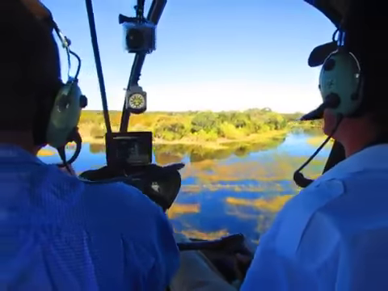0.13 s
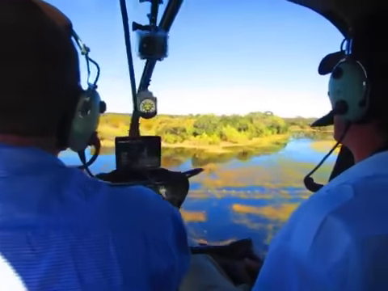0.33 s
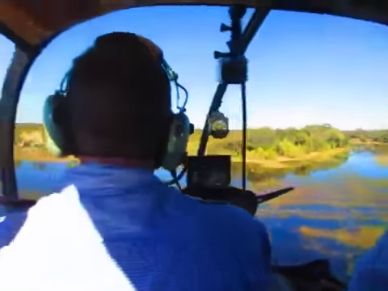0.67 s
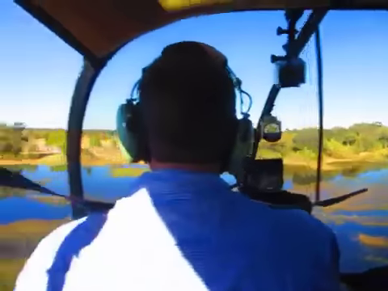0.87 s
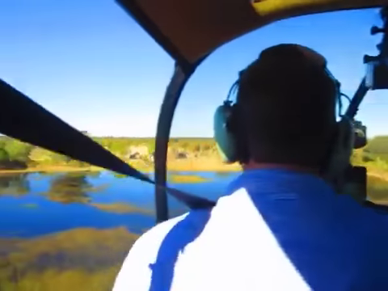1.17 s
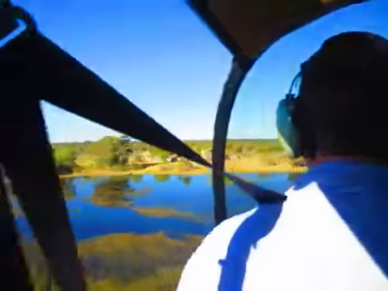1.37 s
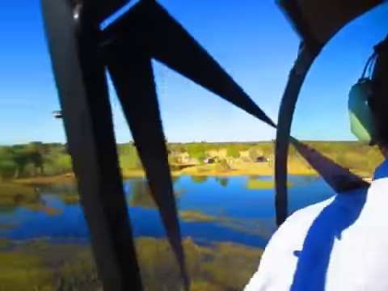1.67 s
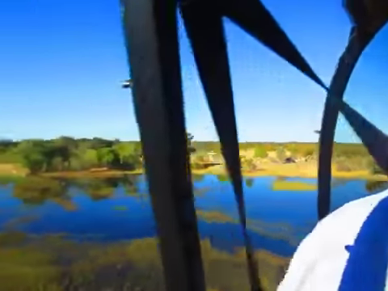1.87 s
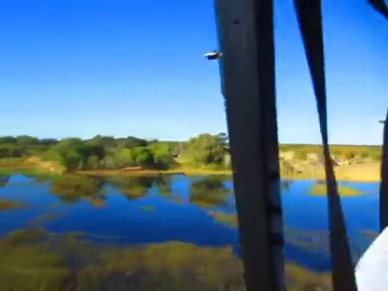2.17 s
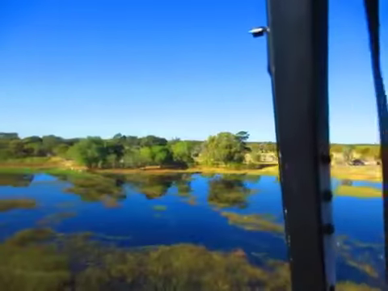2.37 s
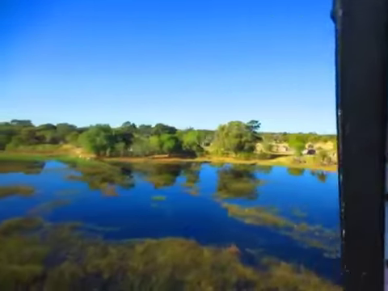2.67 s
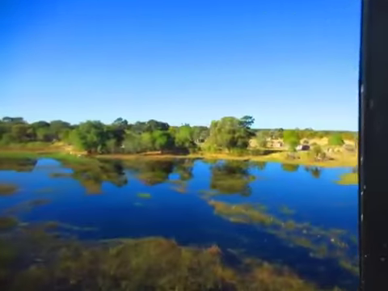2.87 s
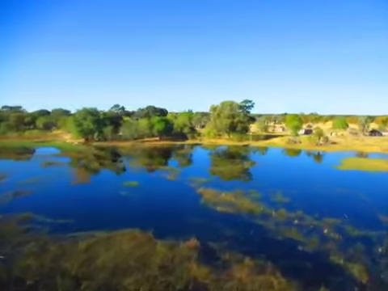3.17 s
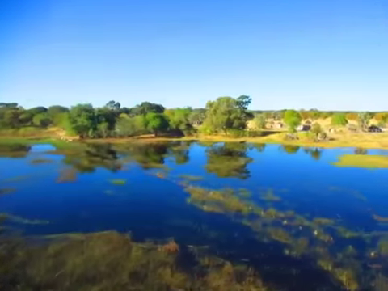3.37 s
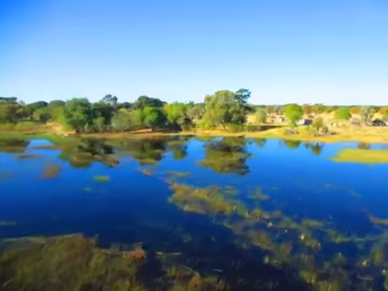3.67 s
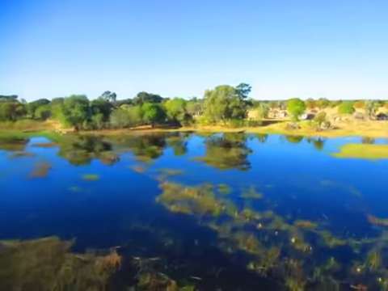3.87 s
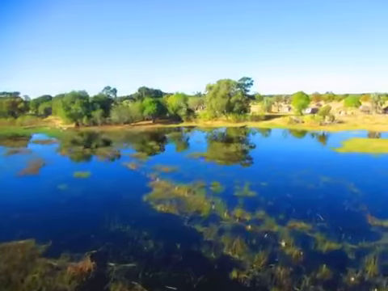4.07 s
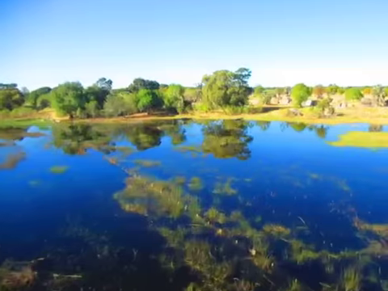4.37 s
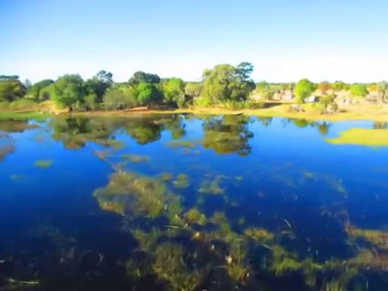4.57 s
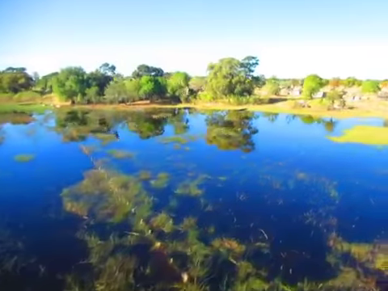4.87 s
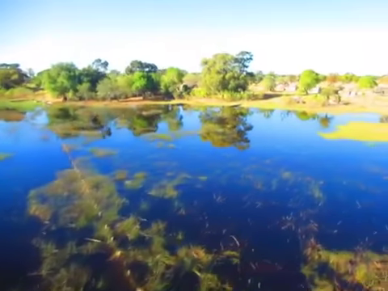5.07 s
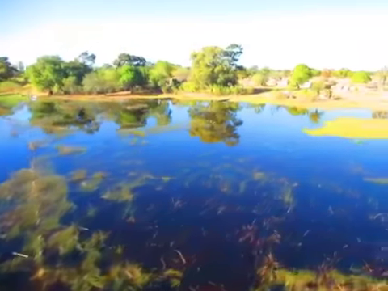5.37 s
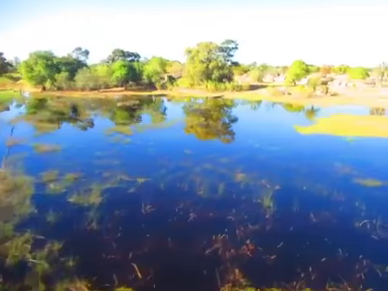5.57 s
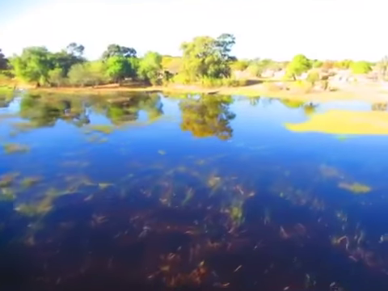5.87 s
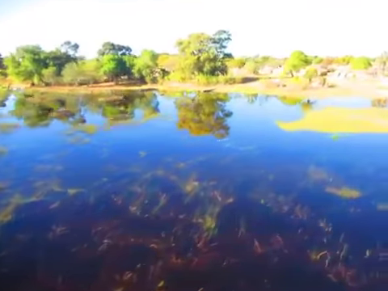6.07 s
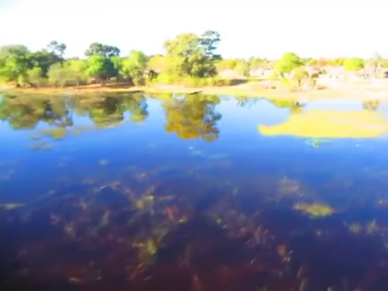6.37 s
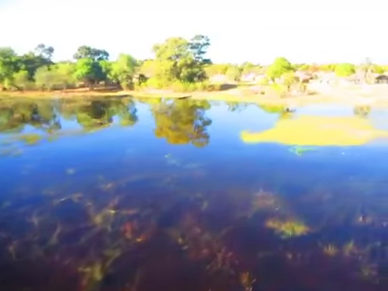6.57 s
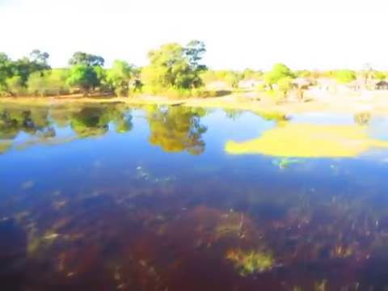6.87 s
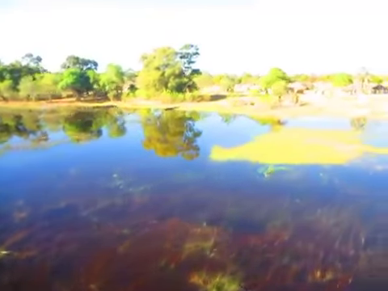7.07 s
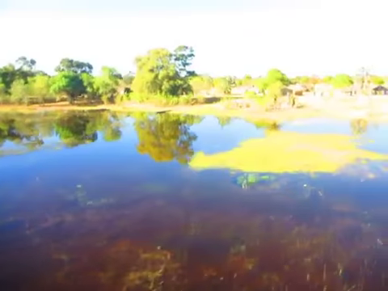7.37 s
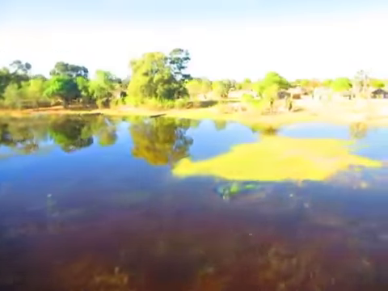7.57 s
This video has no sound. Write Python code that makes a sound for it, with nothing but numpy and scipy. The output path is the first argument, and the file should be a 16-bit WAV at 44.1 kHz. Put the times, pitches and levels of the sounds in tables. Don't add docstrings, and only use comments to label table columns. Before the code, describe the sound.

Inside a small helicopter, rapid hard blade slaps and a humming engine give way to windy, buffeting, crackling downwash at the open door.

```python
import sys
import numpy as np
from scipy import signal
from scipy.io import wavfile
from scipy.ndimage import uniform_filter1d

SR = 44100
rng = np.random.default_rng(int(sys.argv[2]) if len(sys.argv) > 2 else 0)


def invert_db(level):
    return 10 ** (np.asarray(level, dtype=float) / 20)


def unload_wav(signal):
    wavfile.write(
        sys.argv[1],
        SR,
        np.round(np.clip(np.atleast_2d(signal).T, -1, 1) * 32767).astype(np.int16),
    )


N = 340452
TIME = np.arange(N) / SR
BLADE_HZ = 13.68
FIRING_HZ = 136.6
TURN_S = (1.28, 4)


def turned(pair):
    return np.interp(TIME, TURN_S, pair)


def curves(table):
    s, *columns = np.transpose(table)
    return [np.interp(TIME, s, c) for c in columns]


def band(x, lo_hz, hi_hz):
    sos = signal.butter(3, [lo_hz, min(hi_hz, .45 * SR)], "band", fs=SR, output="sos")
    return signal.sosfilt(sos, x)


def hiss(lo_hz, hi_hz):
    x = band(rng.standard_normal(N), lo_hz, hi_hz)
    return x / x.std()


def walk(rate):
    k = int(SR / rate)
    held = np.repeat(rng.standard_normal(N // k + 1), k)
    return 1.09 * uniform_filter1d(uniform_filter1d(held, k), k)[:N]


def fade(x, s):
    return signal.lfilter([1], [1, -np.exp(-1 / (max(s, 1e-4) * SR))], x)


def strikes(lag_ms, db, jitter_ms, scatter_db):
    beat = np.arange(int(N / SR * BLADE_HZ) + 1) / BLADE_HZ
    wildness = np.interp(beat, [2, 4.5], [1, 1.6])
    late, louder = rng.standard_normal((len(beat), 2)).T * wildness
    near = ((beat + .02) * SR).astype(int)
    at = ((beat + (lag_ms[near] + jitter_ms * late) / 1000) * SR).astype(int)
    out = np.zeros(N)
    out[np.clip(at, 0, N - 1)] = invert_db(db[near] + scatter_db * louder)
    return out


def hat(x, front_ms, back_ms, before, after):
    ms = np.arange(-600, 601) / SR * 1000
    u = ms / np.where(ms < 0, front_ms, back_ms)
    shoulders = before * np.exp(-((ms + 2.9) / 1.5) ** 2)
    shoulders += after * np.exp(-((ms - 3.0) / 0.9) ** 2)
    return signal.fftconvolve(x, np.exp(-u ** 2) - shoulders, "same")


def ring(x, modes):
    t = TIME[:SR // 2]
    tail = sum(invert_db(db) * np.sin(2 * np.pi * hz * t) * 1000. ** (-t / t60) for hz, t60, db in modes)
    soft_start = 1 - np.exp(-(t / 0.00056) ** 2)
    return signal.fftconvolve(x, tail * soft_start)[:N]


# time in seconds, boom in Hz,
# boom level in dB, door frame in Hz, frame level in dB.
HOLLOW_TUNING = [(0, 96, -10.5, 168, -9), (.6, 94, -22, 184, -18), (.95, 91, -12.5, 197, -7),
                 (1.5, 89, -6.5, 200, -21), (1.75, 101, -12, 250, -5.5), (2.1, 105, -34, 243, -3.5),
                 (2.4, 106, -12, 257, -21), (2.7, 126, -14, 235, -17), (3, 99, -17, 212, -8),
                 (3.4, 90, -28, 256, -9), (3.8, 94, -20, 254, -27), (4.3, 85, -7, 180, -23),
                 (4.8, 92, -18, 203, -4), (5.4, 88, -10.5, 258, -8.5), (6, 85.5, -13, 251, -15),
                 (7.72, 91, -6, 243, -16)]
BOOM_T60_S, FRAME_T60_S = .17, .065


def hollows(blows):
    out, t = np.zeros(N + SR), TIME[:SR // 5]
    boom_hz, boom_db, frame_hz, frame_db = curves(HOLLOW_TUNING)
    for i in np.flatnonzero(blows):
        boom = invert_db(boom_db[i]) * np.sin(2 * np.pi * boom_hz[i] * t) * 1000. ** (-t / BOOM_T60_S)
        frame = invert_db(frame_db[i]) * np.sin(2 * np.pi * frame_hz[i] * t) * 1000. ** (-t / FRAME_T60_S)
        out[i:i + len(t)] += blows[i] * (boom + frame)
    return out[:N]


# time in seconds, slap peak in dB.
SLAP_LEVEL = [(0, -5), (.35, -5.5), (.9, -4.5), (1.2, -7), (1.5, -9), (2.07, -11), (2.4, -14.5),
              (2.94, -14), (3.5, -11.5), (4.1, -10.5), (4.45, -22.5), (5, -15), (5.6, -13.5), (6, -29),
              (6.45, -9.5), (6.75, -55), (7.1, -32), (7.72, -19)]
# time in seconds,
# slap lag in ms, swish lag in ms.
BLADE_LAG = [(0, 10.2, 18), (.7, 10.3, 15), (1.3, 12, 8), (1.9, 13.9, 1), (2.7, 15.9, 0), (3.75, 15.5, -4),
             (4.4, 15.6, -1), (5.3, 19.9, 0), (5.9, 21, 2), (6.7, 24.4, 4.5), (7.4, 24.9, 6),
             (7.72, 25.3, 13)]
# time in seconds, delay after the
# first strike in ms, level against the first in dB.
WAKE_STRIKE = [
    (0, 25.7, -9.5),
    (1, 28.5, -10.5),
    (1.6, 24.6, -8),
    (2.3, 26.6, -2.5),
    (2.75, 18.7, 0),
    (3.4, 18.7, -5.5),
    (4, 14.5, -4),
    (4.4, 14.8, 2),
    (4.9, 8.9, -10.5),
    (7.72, 9.7, -19),
]
# mode in Hz, decay T60 in seconds, level in dB.
CABIN_MODES = [
    (126, 0.22, -2),
    (275, 0.04, 1.5),
    (327, 0.021, -1.5),
    (699, 0.086, -6.5),
    (1197, 0.035, -9.5),
    (1600, 0.022, -47),
    (2010, 0.055, -37),
    (2780, 0.019, -63),
]
PANEL_DB, CRACK_DB, SPIKE_DB = (-7, -29), (-24, -33), (-1, -4.5)
BLUNT = (0, .7)
SUCK_IN = .72
WAKE_DIP_MS, WAKE_DIP = 5.6, 0.29
ECHO_SHARE = .6


def slaps():
    lag_ms = curves(BLADE_LAG)[0]
    wake_ms, wake_db = curves(WAKE_STRIKE)
    db = curves(SLAP_LEVEL)[0]
    first = strikes(lag_ms, db, jitter_ms=.08, scatter_db=1.0)
    second = strikes(lag_ms + wake_ms, db + wake_db, jitter_ms=.15, scatter_db=1.5)
    cabin = ring((0.16 * second - first) * invert_db(turned(PANEL_DB) - 6.5), CABIN_MODES)
    door = hollows(0.62 * second - first)

    tear = strikes(lag_ms + 2, turned(CRACK_DB) - 27, jitter_ms=.4, scatter_db=1.0)
    tear += .4 * np.roll(tear, int(.003 * SR))
    tear_front = 1.1 * np.roll(tear / 1, -int(.0022 * SR))
    tear = tear + tear_front
    grit = hiss(634, 803) + invert_db(-2.5) * hiss(690, 1360) + invert_db(-12.0) * hiss(1760, 2520)
    grit += invert_db(-27) * hiss(2230, 3530) + invert_db(-35) * hiss(4250, 4700)
    torn = fade(fade(tear, .0022), .0003)
    click = np.r_[1., np.zeros(SR // 10)]
    burst = fade(fade(click, .0022), .0003) * grit[SR:SR + len(click)]
    crack = np.sqrt(1 - ECHO_SHARE) * torn * grit
    crack += np.sqrt(ECHO_SHARE) * signal.fftconvolve(tear, burst)[:N]

    dip = WAKE_DIP * hat(np.roll(second, -int(WAKE_DIP_MS / 1000 * SR)), 1.0, 0.6, 0, 0)
    spike = first * invert_db(turned(SPIKE_DB))
    sharp = hat(spike * (1 - turned(BLUNT)), 0.31, 0.44, SUCK_IN, 0.67)
    blunt = hat(spike * turned(BLUNT), .9, 1.1, .9, .55)
    wake = hat(second, 0.47, 4.3, 0.046, 0.78)
    return wake - dip - sharp - blunt + cabin + door + crack


# time in seconds, firing tone in dB, its octave in dB.
ENGINE_LEVEL = [(0, -22, -36), (.5, -23.5, -31), (1.2, -25.5, -36.5), (1.9, -39, -37), (2.3, -54, -32),
                (2.55, -30.5, -54), (2.9, -33.5, -40), (3.3, -35.5, -40.5), (4.4, -33.5, -63),
                (5.0, -43, -45), (5.45, -43, -29.5), (5.65, -34, -43), (6.1, -34, -36.5), (6.6, -34.5, -43),
                (7, -39, -35.5), (7.4, -34, -36), (7.72, -32.5, -65)]
# multiple of the firing rate, level at the cabin seat in dB.
SHAFT_LINES = [
    (.834, -35),
    (2.335, -38),
    (2.668, -37),
    (2.851, -38),
    (3.627, -39),
]
# multiple of the firing rate, level in dB.
HUM_LINES = [
    (1.666, -44),
    (3.0, -47),
]
SHAFT_FADE_S, SHAFT_FADE_DB = (1.47, 4.24), (-0.5, -18)
HALF_DB = (-31, -56)
FAN_DB = (-74, -93)


def engine():
    tone_db, octave_db = curves(ENGINE_LEVEL)
    phase = 2 * np.pi * FIRING_HZ * TIME + 0.29 * walk(1.42)
    out = invert_db(tone_db + 0.46 * walk(9.9)) * np.sin(phase)
    out += invert_db(octave_db + 2.5 * walk(11.0)) * np.sin(2 * phase + 2.0 + 0.81 * walk(12))
    away_db = np.interp(TIME, SHAFT_FADE_S, SHAFT_FADE_DB)
    for multiple, db in SHAFT_LINES:
        out += invert_db(db + away_db + 1.0 * walk(5)) * np.sin(multiple * phase + .2 * walk(4))
    for multiple, db in HUM_LINES:
        out += invert_db(db + 2 * walk(3)) * np.sin(multiple * phase)
    out += invert_db(turned(HALF_DB) + 1.2 * walk(3.9)) * np.sin(3 / 2 * phase)
    fan = invert_db(turned(FAN_DB) + 3.0 * walk(30)) * hiss(11430, 11680)
    return np.sqrt(2) * out + fan


# frequency in Hz, density in dB per Hz.
AIR_SPECTRUM = [(12, -37), (22, 3), (75, -6), (105, 1.5), (141, -4.5), (157, -3.5), (208, -2), (274, -4),
                (298, -5.5), (908, -17), (1870, -32.5), (4200, -52.5), (7760, -57), (10500, -51),
                (15600, -54.5)]
# time in seconds, level in dB.
GUST_LEVEL = [(0, 1), (.5, 0.5), (1.2, 2.5), (1.7, 1.5), (2, 2.5), (2.4, 0.74), (3.5, 0), (4, -1),
              (4.3, -1), (4.7, -1.5), (5.1, 1), (5.5, 2), (5.9, 0), (6.5, 1), (6.9, -0.5), (7.3, 0.5),
              (7.72, 2)]
# inside level in dB, outside level in dB, share of the gust.
AIR_BANDS = [
    (-28, -29.5, 0.31),
    (-30, -31.5, 0.69),
    (-40, -39, 1.28),
    (-62, -61.5, 1.07),
]
WASH_LAG_MS = (8, -13)


def air():
    gust_db = curves(GUST_LEVEL)[0]
    lag_ms, swish_ms = curves(BLADE_LAG)
    tip = 2 * np.pi * BLADE_HZ * (TIME - (swish_ms + 4) / 1000)
    swish_db = 3.8 * np.cos(tip + .5 * np.cos(tip))
    swish_db += 1.3 * walk(90) + 2.0 * walk(200)
    depth_db = np.interp(TIME, [1.6, 3], [2.6, 2.1])
    wash_s = TIME - (lag_ms + turned(WASH_LAG_MS)) / 1000
    wash_db = depth_db * np.cos(2 * np.pi * BLADE_HZ * wash_s)
    flutter = walk(45) + turned((.2, .6)) * walk(16)
    colour_hz, colour_db = np.transpose(AIR_SPECTRUM)
    groups = [0, 0, 0, 0]
    for hz in 22 * 2 ** (np.arange(29) / 3):
        treble = np.clip(np.log2(hz / 2200) / 1.5, 0, 1)
        ragged = np.clip(np.log2(hz / 90) / 1.9, 0, 1) * np.clip(1 - 1.9 * treble, 0, 1)
        db = np.interp(np.log(hz), np.log(colour_hz), colour_db) + 10 * np.log10(hz)
        db = db + treble * swish_db + (1 - treble) * (.5 + 0.41 * ragged) * wash_db
        db += 1.57 * ragged * flutter + 0.57 * walk(20) + 0.95 * treble * walk(150)
        layer = np.searchsorted([200, 700, 4500], hz)
        groups[layer] += invert_db(db) * hiss(hz / 2 ** (1 / 6), hz * 2 ** (1 / 6))
    out = np.zeros(N)
    for (inside, outside, share), group in zip(AIR_BANDS, groups):
        out += invert_db(turned((inside, outside)) + share * gust_db) * group / group.std()
    return out


FLICK_PER_S, FLICK_DB, FLICK_MS = 70, (-38, -29.5), 0.58


def flicks():
    wait, side, size = rng.random((1000, 3)).T
    at = (np.cumsum(-np.log(1 - wait)) / FLICK_PER_S * SR).astype(int)
    heard = at < N
    kicks = np.zeros(N)
    kicks[at[heard]] = (np.where(side < .6, 1, -1) * invert_db(12 * size))[heard]
    ms = np.arange(-300, 301) / SR * 1000
    slope_ms = FLICK_MS * np.where(ms < 0, .75, 1.25)
    cusp = np.exp(-np.sqrt((ms / slope_ms) ** 2 + .1))
    pops = band(signal.fftconvolve(kicks, cusp, "same"), 148, 3100)
    return pops * invert_db(turned(FLICK_DB) + curves(GUST_LEVEL)[0])


BEAT_FROM_S, BEAT_DB, BEAT_SCATTER_DB = 1.3, -29.5, 2.5
BEAT_SHARP_DB, BEAT_MS, BEAT_JITTER_MS = -32, 3.9, 2.5


def beat_puffs():
    beat = np.arange(int(N / SR * BLADE_HZ)) / BLADE_HZ
    late, louder, sharper = rng.standard_normal((len(beat), 3)).T
    at = (beat * SR).astype(int)
    s = beat + (curves(BLADE_LAG)[0][at] - 2 + BEAT_JITTER_MS * late) / 1000
    db = BEAT_DB + curves(GUST_LEVEL)[0][at] + BEAT_SCATTER_DB * louder
    rows = np.transpose([s, db, BEAT_SHARP_DB + 3.7 * sharper, np.full(len(s), BEAT_MS)])
    return list(rows[s > BEAT_FROM_S])


# time in seconds, peak in dB, sharpness in dB,
# length in ms.
STRONG_PUFFS = [(1.841, -20, -17, 9.3), (1.862, -17.5, -27, 9.7), (2.42, -24, -28, 7.6),
                (2.7785, -23, -14, 4.3), (2.931, -17.5, -21, 3.7), (3.071, -26, -25, 5.1),
                (3.381, -21, -11, 13), (3.582, -20, -23, 11), (3.647, -12.5, -5, 4), (3.735, -18, -31, 5),
                (4.2335, -25, -21, 5.1), (4.249, -22, -8, 5.8), (4.321, -21.5, -8, 11),
                (4.404, -25, -6, 12), (4.432, -11, -26, 2.5), (4.464, -23, -1, 8.4),
                (4.65, -19.5, -23, 7.5), (4.69, -30, 3, 3.2), (5.152, -22, -2, 5), (5.349, -25.5, -4, 20),
                (5.509, -22, -8, 29), (5.796, -12.5, -24, 3.7), (5.962, -17.5, -8, 8.3),
                (5.9895, -31, -1, 12), (6.14, -28, -3, 4.4), (6.312, -22.5, -9, 8.9), (6.5312, -30, -1, 18),
                (6.8065, -29.5, 0.5, 22), (7.024, -23, -6, 7.8), (7.4083, -20, -20, 5.7),
                (1.401, -26, -20, 5), (2.722, -28, -17, 4.1), (3.004, -34, -12, 5.3),
                (3.521, -24.5, -12, 6), (3.574, -23, -10, 5), (3.999, -35, -8, 5), (4.173, -26, -12, 8),
                (4.186, -21, -13, 5.5), (5.054, -22, -18, 6), (5.134, -31, -8, 4.5), (5.42, -24, -4, 8.2),
                (5.586, -19, -16, 5.5), (5.773, -26, -10, 5.3), (5.877, -24, -12, 6.9),
                (5.937, -21, -15, 4.8), (6.384, -17, -18, 3), (6.433, -33, -12, 2.9),
                (6.597, -25, -12, 5.6), (7.004, -28, -2, 4)]
PUFF_LOW_DB, PUFF_TOP_DB = 13.5, -37


def puffs():
    out, t = np.zeros(N + SR), TIME[:SR // 8]
    low, mid, high, top = hiss(300, 660), hiss(530, 1600), hiss(1050, 2820), hiss(3600, 13500)
    crackle = invert_db(6 * np.tanh(walk(300)))
    for s, db, high_db, ms in STRONG_PUFFS + beat_puffs():
        at = min(int((s - .0025) * SR), N - len(t))
        part = slice(at, at + len(t))
        fall_s = np.clip(1.5 * ms / 1000 + .0015, .004, .04)
        shape = (1 - np.exp(-(t / .0035) ** 2)) * np.exp(-(t / fall_s) ** 1.5)
        bright = mid[part] + invert_db(high_db - 3.0) * high[part] + invert_db(PUFF_TOP_DB - 4.0) * top[part]
        power = np.sum((shape * crackle[part] * mid[part]) ** 2) / np.sum(shape ** 2)
        grain = crackle[part] / np.sqrt(power)
        out[part] += invert_db(db - 11.5) * shape * (grain * bright + invert_db(PUFF_LOW_DB - 8.5) * low[part])
    return out[:N]


# time in seconds, peak in dB, body against peak in dB.
GRILLE_TICKS = [(2.782, -37, 2), (2.931, -37, 13.5), (3.005, -37, 8), (3.084, -42, 11), (3.234, -43, 14),
                (3.3775, -35, 2), (3.403, -41, 8), (3.522, -48, 6), (3.5821, -51, 8), (3.5828, -40, 7),
                (3.633, -50, 6), (3.6476, -32, -1), (3.72, -45, 9), (3.823, -41, 11), (3.9988, -44, 9),
                (4.1824, -42, 12), (4.235, -34, 6), (4.2561, -40, 5), (4.305, -42, 16), (4.3217, -34, 7),
                (4.3993, -33, 3), (4.464, -28.5, -8), (4.651, -41.5, 9), (4.6883, -40, 7), (4.803, -50, 19),
                (5.041, -42, 6), (5.1351, -43, 11), (5.156, -39, 14), (5.2147, -51, 10), (5.2822, -50, 10),
                (5.3551, -44, 6), (5.3551, -37, 5), (5.397, -45, 6), (5.4213, -41, 8), (5.5142, -53, 7),
                (5.513, -40, 11), (5.5661, -38, 1), (5.589, -45, 6), (5.6388, -34.5, 5), (5.7646, -43, 11),
                (5.7961, -48, -1), (5.876, -39, 12), (5.9378, -41.5, 12), (5.9638, -41, 6),
                (5.9923, -35, 10.5), (6.1386, -48, 8), (6.1398, -44, 10), (6.2969, -40, 9), (6.432, -38, 9),
                (6.442, -37.5, 7), (6.5094, -42, 14), (6.532, -38, 9), (6.5987, -44, 2), (6.799, -48, 9),
                (6.8055, -40, 12), (6.8162, -41, 7), (6.817, -41, 4), (7.002, -40, 7), (7.031, -47, 5),
                (7.671, -44, 12)]
TICK_DB, TICK_MS = -1.5, 0.6


def ticks():
    s, db, body_db = np.transpose(GRILLE_TICKS)
    at = (s * SR).astype(int)
    edge, body = np.zeros(N), np.zeros(N)
    edge[at] = invert_db(db + TICK_DB - 28.5)
    body[at] = invert_db(db + TICK_DB + body_db - 28)
    edge = fade(fade(edge, .0007), 0.98 * TICK_MS / 1000)
    body = fade(fade(body, .0007), 1.9 * TICK_MS / 1000)
    bright = hiss(1660, 3800) + invert_db(-10) * hiss(4000, 7200) + invert_db(-12) * hiss(9000, 15500)
    return edge * bright + body * hiss(930, 2200)


# start in seconds, length in ms, push left
PINNED_GUSTS = [(3.3263, 5.1, -.2), (3.3916, 3.9, -.12), (3.649, 2, -.12), (4.001, 3, -.14),
                (4.0159, 5.9, .07), (4.2095, 3, .17), (4.2374, 4.6, -.12), (4.2447, 5.1, .13),
                (4.306, 6, .17), (4.3896, 6.3, .07), (4.4495, 4.4, .16), (4.466, 5, -.18),
                (4.6764, 6.6, .09), (4.8239, 4.4, .13), (5.0032, 4.4, -.1), (5.1708, 3.4, -.12),
                (5.2639, 4.6, .18), (5.5051, 3.6, .2), (5.5554, 6, .08), (5.7914, 5.9, .07),
                (6.0089, 4.1, -.1), (6.0181, 3.4, .2), (6.1715, 4.4, .09), (6.2511, 4.1, -.12),
                (6.4275, 4.1, .16), (6.6512, 3.4, -.18), (7.0443, 4.1, .1)]


def stalls(dry):
    deaf, rail = np.zeros(N), np.zeros(N)
    for s, ms, push in PINNED_GUSTS:
        end = int((s + ms / 1000) * SR)
        deaf[int(s * SR):end] = 1
        rail[int((s - .001) * SR):end] = push
    edge = int(.0005 * SR)
    deaf = uniform_filter1d(deaf, edge)
    rail = uniform_filter1d(uniform_filter1d(rail, edge), edge)
    jumps = fade(np.diff(rail, prepend=0), .003)
    leak = deaf * band(dry, 3500, 16000)
    return dry * (1 - .9 * deaf) + .5 * leak + 1.05 * jumps


def scene():
    mix = slaps() + engine() + air() + flicks() + puffs() + ticks()
    return mix[None] * np.minimum(TIME / .004, 1)


def top_cut(x):
    return signal.sosfilt(signal.butter(12, 15800, fs=SR, output="sos"), x)


def record(dry):
    thin = signal.sosfilt(signal.butter(2, 38, "high", fs=SR, output="sos"), stalls(dry))
    rounded = .8 * np.tanh(thin / .8)
    soft = signal.sosfilt(signal.butter(3, 13000, fs=SR, output="sos"), rounded)
    cut = signal.sosfilt(signal.ellip(10, .2, 70, 15700, fs=SR, output="sos"), soft)
    return top_cut(cut)


dry = scene()
out = record(dry)
unload_wav(out)
```